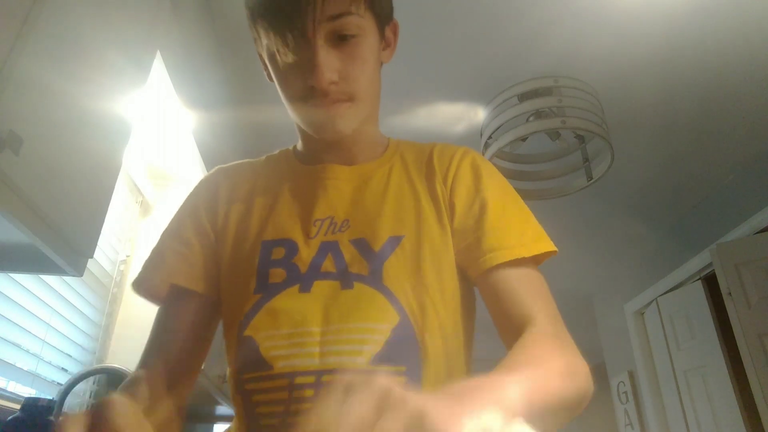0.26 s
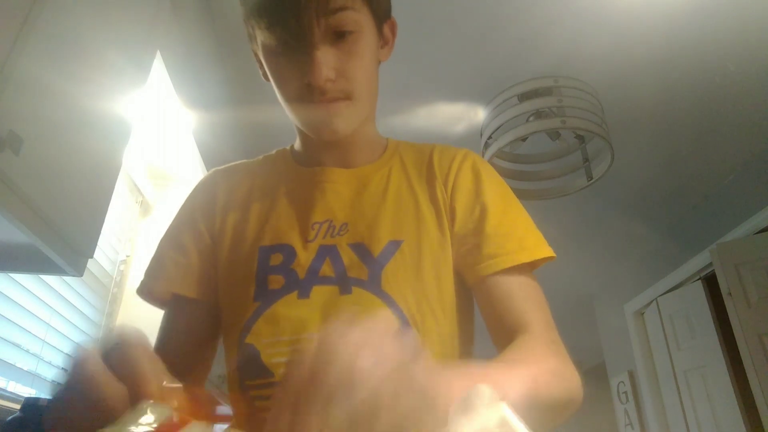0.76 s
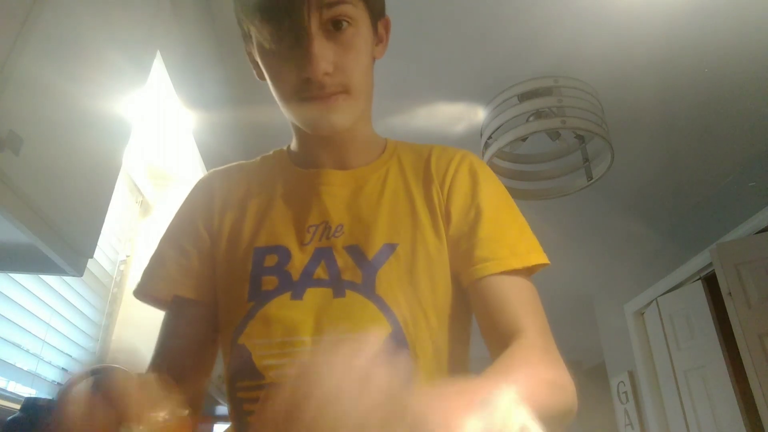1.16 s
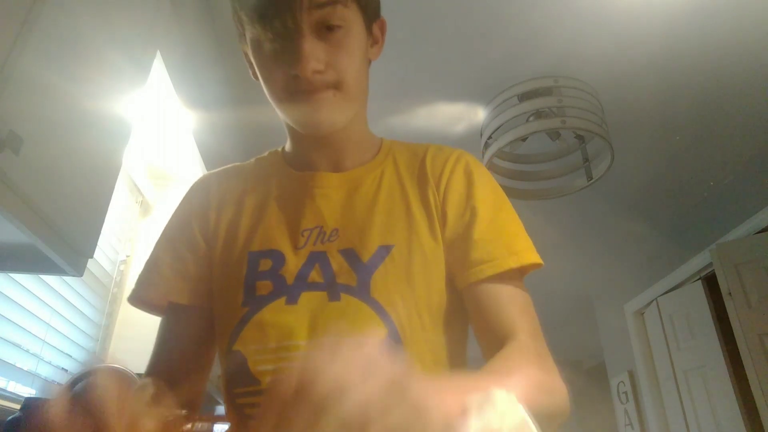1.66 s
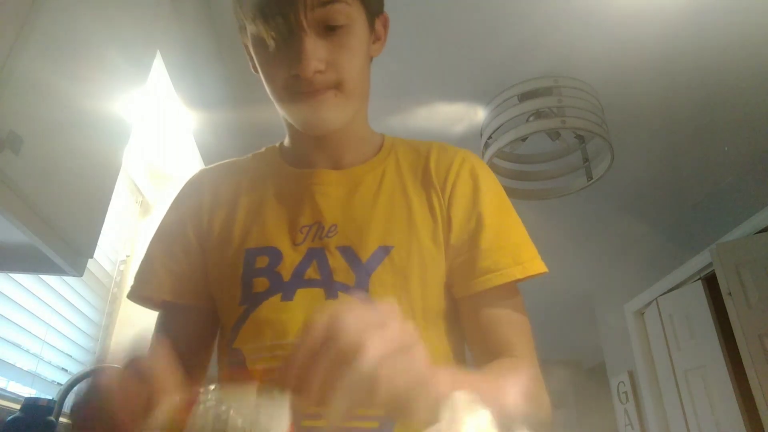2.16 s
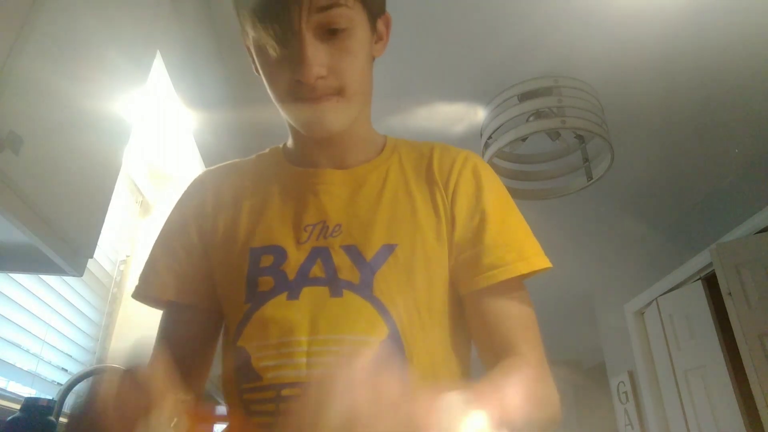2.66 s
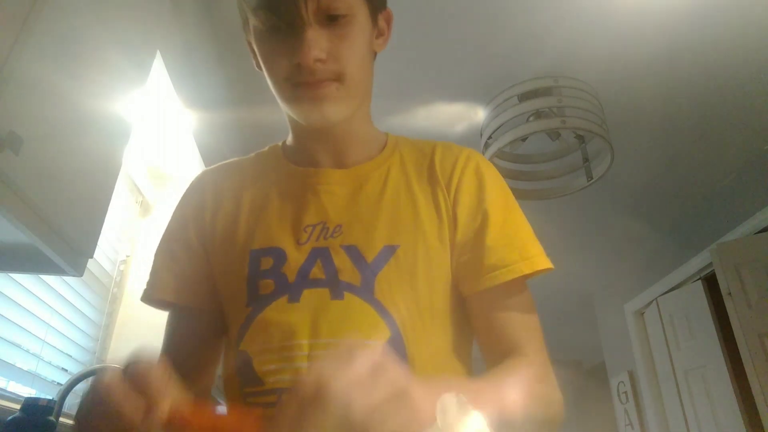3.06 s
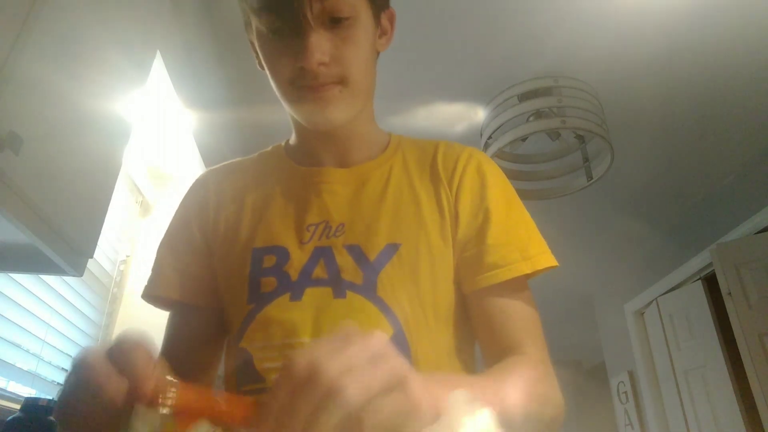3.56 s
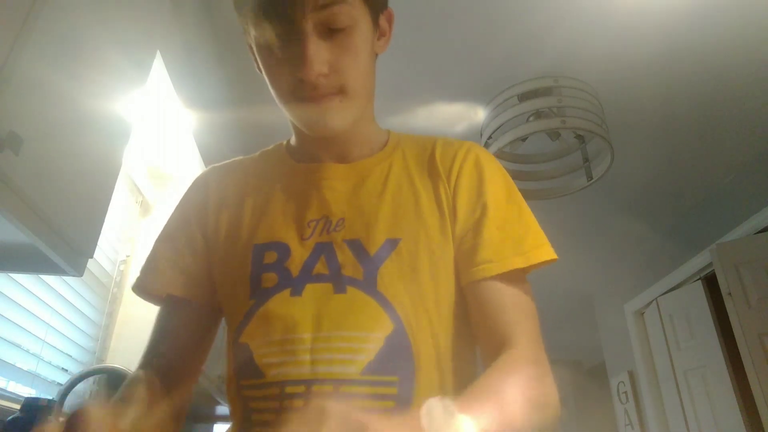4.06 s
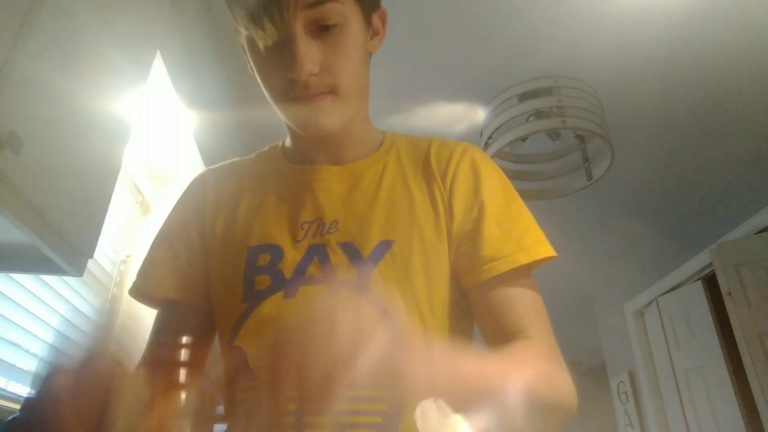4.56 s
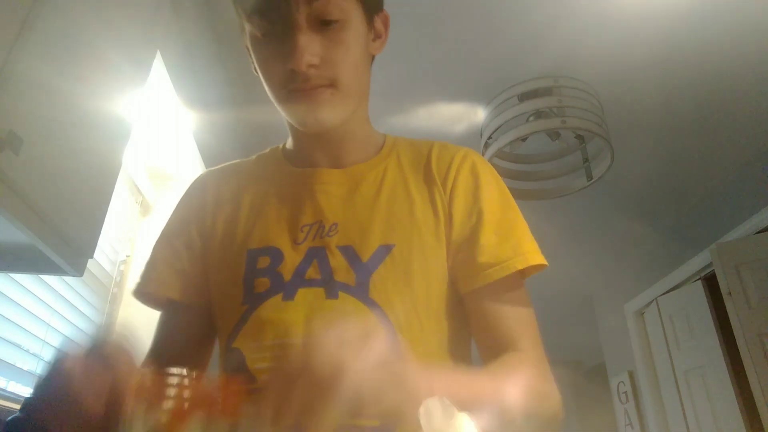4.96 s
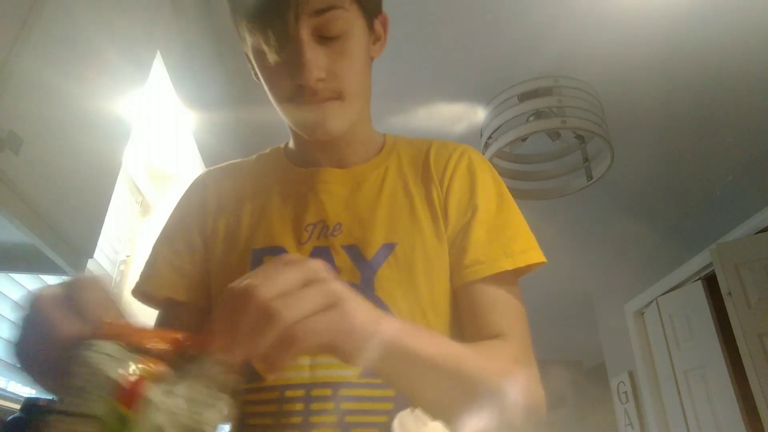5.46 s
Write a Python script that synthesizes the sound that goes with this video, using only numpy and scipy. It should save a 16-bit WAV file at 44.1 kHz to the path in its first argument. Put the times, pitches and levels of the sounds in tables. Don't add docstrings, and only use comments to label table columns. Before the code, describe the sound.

A foil bag of chips is shaken quickly by hand up close, crackling and snapping with dull hollow knocks in a small kitchen.

```python
import sys
import numpy as np
from scipy import signal
from scipy.fft import rfft, irfft, next_fast_len
from scipy.io import wavfile
from scipy.ndimage import uniform_filter1d

SR = 44100
rng = np.random.default_rng(int(sys.argv[2]) if len(sys.argv) > 2 else 0)


def linear_from_db(decibels):
    return 10 ** (np.asarray(decibels, float) / 20)


def int16_out(signal):
    q = np.round(np.clip(np.atleast_2d(signal).T, -1, 1) * 32767)
    wavfile.write(sys.argv[1], SR, q.astype(np.int16))


N = 252516

# peak_s, snap_level_db, fall_ms, knock_minus_snap_db
LANDINGS = [(0.082, -25, 13, -5), (0.101, -19, 14.4, 1.5), (0.49, -21, 30, -0.5), (.737, -24, 7.6, -5),
            (.962, -25, 11, -5), (1.037, -24.5, 19, -7), (1.087, -24, 5.5, 2), (1.461, -21.5, 19, 1.2),
            (1.57, -24.5, 15, -6.5), (1.626, -21.5, 13, -4.5), (1.643, -24.5, 26, 2), (1.763, -27, 36, -7),
            (2.302, -24.5, 20.5, 6), (2.535, -21, 15.7, 1), (2.777, -19, 16.5, 3.5),
            (3.033, -21.5, 13.5, 1), (3.265, -20.5, 44, -2), (3.288, -22, 6.5, 11),
            (3.351, -23.5, 24, -2.5), (3.508, -17.5, 20, 0.5), (3.538, -27, 20, -2), (3.75, -18.5, 10.5, 3),
            (3.936, -21, 19, 5.5), (3.979, -23, 34, -7), (4.017, -22, 19, 3.5), (4.278, -21.5, 17.7, 6),
            (4.657, -18.5, 15.6, 4.2), (4.923, -19.5, 16, 3.5), (5.16, -22, 13, 2.5),
            (5.325, -21, 25.4, 1.3)]
# peak_s, snap_level_db, fall_ms, knock_minus_snap_db
SLIDES = [(.02, -28.5, 3, -8.5), (0.306, -29, 25, 5), (.369, -26, 13, -3), (.578, -28, 17, 0.5),
          (.695, -28, 42, 3), (.828, -32, 25, -5.5), (0.886, -26, 13, -7), (1.067, -23.5, 9.1, 4.5),
          (1.168, -28.5, 17, 0.5), (1.24, -22.5, 7.5, -5), (1.278, -24.5, 22, 6.5),
          (1.368, -26.5, 10.6, -0.5), (1.449, -28.5, 11, 5.5), (1.551, -29, 12, 5.5),
          (1.686, -27.5, 5.1, -2), (1.737, -25, 10, -1.5), (1.866, -30.5, 15, -12), (2.005, -20, 20, 0),
          (2.059, -28, 8.6, -3), (2.879, -30.5, 21, -2), (3.124, -32, 19, -2.5), (3.598, -26, 26, 0.5),
          (3.818, -31.5, 15, 2.5), (4.112, -19.5, 18, 0), (4.191, -26, 14, -4.5), (4.415, -25, 13.4, 3.5),
          (4.998, -25, 11.6, 4.5), (5.22, -29.5, 10.5, 1.5), (5.31, -28, 7, 3.5), (5.716, -29, 62, 0)]
# peak_s, snap_level_db, fall_ms
TUMBLES = [(.062, -33.5, 8), (0.441, -36, 35), (.927, -28.5, 11.5), (1.42, -32.5, 15), (1.603, -31, 15),
           (1.831, -30.5, 20), (1.944, -35, 11), (2.086, -32.5, 34), (2.137, -36, 28), (2.365, -36.5, 31),
           (2.466, -30, 12), (2.516, -31.5, 16), (2.588, -35.5, 42), (2.629, -30.5, 10), (2.745, -32.5, 14),
           (2.825, -34, 24), (2.848, -35.5, 13), (2.956, -29.5, 29), (3.093, -31.5, 8.5), (3.47, -34, 21),
           (3.901, -32, 62), (4.349, -36.5, 21), (4.473, -36.5, 19), (4.631, -29.5, 11), (4.721, -32, 32),
           (4.882, -41, 9), (5.383, -33, 15), (5.589, -31, 23), (5.62, -34, 19), (5.686, -35.5, 22)]
# peak_s, snap_level_db, fall_ms
CRINKLES = [(0.224, -30.5, 7.5), (.336, -31, 8.1), (0.469, -31, 17), (0.627, -40.5, 7.5),
            (.719, -27.5, 7.5), (0.764, -28.5, 14), (0.848, -22, 8.1), (.989, -30, 9), (1.097, -31, 25),
            (1.182, -31.5, 35), (1.388, -22.5, 6.7), (1.92, -28, 5.8), (2.113, -30, 8.3), (2.18, -29.5, 11),
            (2.804, -22.5, 9.3), (2.992, -29, 6.9), (3.005, -27, 18), (3.24, -32, 8.4), (3.44, -35, 7.5),
            (4.513, -39, 7.5), (4.532, -41, 7.5), (4.707, -33, 7.5), (4.736, -34, 23), (4.818, -41, 7.5),
            (4.856, -41, 6.9), (5.114, -34, 6.9), (5.132, -41, 7.5), (5.237, -32, 7.5), (5.25, -30, 16),
            (5.406, -28, 12)]
# peak_s, snap_level_db, knock_minus_snap_db
SLIPS = [(0.178, -29.5, 5), (0.195, -28, 6), (0.212, -28.5, -5), (.253, -35, -6), (.786, -31.5, 1),
         (1.325, -38, 5), (1.346, -31, 0), (1.527, -34, 4), (1.804, -32.5, 10), (1.82, -31, -1),
         (1.891, -30, -1), (1.97, -28, 3), (2.039, -31, -2.2), (2.225, -40.5, 5), (2.279, -33, -13),
         (2.41, -39, 3), (2.434, -34.5, 6), (2.483, -36, 0), (2.653, -28, 0), (2.71, -29, 4),
         (2.898, -28, -8), (3.168, -33, 1.2), (3.19, -29, 1), (3.225, -32.5, 3), (3.69, -26, -4),
         (3.702, -29, 2.2), (4.776, -34.5, -6), (5.1, -32.5, 4), (5.512, -31.5, 1), (5.546, -33, 1)]
RISE_MS = {"landing": 5.9, "slide": 19.7, "tumble": 5.4, "crinkle": 3, "slip": 3}
# time_s, snap_level_db
STIRRING = [(0, -41.5), (.3, -37.5), (.55, -42), (1, -37), (1.5, -40), (1.8, -41.5), (2.2, -51.5),
            (2.55, -37), (3, -44.5), (3.45, -43), (3.75, -38.5), (4.3, -39), (4.55, -52.5), (4.85, -53),
            (5.25, -36.5), (5.75, -53)]
# start_s, peak_db
POPS = [(.0169, -21), (.439, -20), (.663, -13), (.846, -12.5), (1.147, -13), (1.1992, -16), (1.2356, -18),
        (1.2713, -12.5), (1.3463, -26), (1.3634, -16), (1.448, -12.5), (1.805, -12.5), (1.8195, -12.5),
        (1.9719, -11), (1.9936, -12.5), (2.1358, -16), (2.2248, -21), (2.369, -21), (2.762, -15),
        (2.8981, -12.5), (3.1854, -18.5), (3.2396, -15.5), (3.687, -24), (4.41, -13), (4.6164, -18),
        (5.1315, -18), (5.3023, -14), (5.4079, -12.5), (5.51, -14), (5.6208, -10)]
# pitch_hz, level_db
FILM_COLOUR = [(1200, -11), (1700, -10.5), (2050, -62), (2500, -8.5), (3700, -12), (4300, -5), (7500, -9.5),
               (9000, -15), (10300, -11), (11500, -16), (15600, -18)]
# pitch_hz, width_hz, level_db
BAG_RESONANCES = [(131, 29, -20), (220.6, 95, -5), (294, 32, -7.5), (484, 98.6, 0), (557, 123, -3.5),
                  (947.5, 122, 2.5), (1065, 111.4, 1.5), (1200, 182, -4), (1720, 570, -10.5)]
# pitch_hz, time_s
ROOM_DECAY = [(200, 0.31), (1000, 0.059), (4000, 0.14), (12000, 0.028)]
# pitch_hz, level_db
ROOM_LEVEL = [(100, -3), (300, -4), (600, -11), (1200, -15), (3000, -14), (8000, -15), (15000, -15)]
# pitch_hz, level_db
LEFT_MINUS_RIGHT = [(40, 2), (100, 4.5), (220, 8), (450, 5), (700, 1.5), (900, 4.5), (1100, -0.14),
                    (2200, 2.46), (4300, 0.16), (6500, 0.1), (8500, 1), (10500, 3), (15000, 3.5)]
# pitch_hz, phase_rad
RIGHT_PHASE = [(60, 1.13), (130, 1.82), (215, -0.6), (300, -3), (430, -0.72), (600, -0.3), (1080, -0.93),
               (1500, 0.26), (2200, -0.18), (3400, 0.01), (5400, 0.16), (6500, -0.18), (7600, -0.72),
               (13000, 0.15)]
# pitch_hz, level_db_per_hz
KITCHEN_AIR = [(25, -100), (45, -80), (70, -86), (150, -82), (400, -73.5), (1000, -86), (3000, -85),
               (8000, -106.5), (15000, -100)]
# pitch_hz, width_hz, level_db
FRIDGE_HUM = [(113.5, 12, -53.5), (200, 14, -56)]
# pitch_hz, level_db
MICROPHONE_BAND = [(20, -25), (45, -6), (60, 0), (15700, 0), (15950, -25), (16200, -34),
                   (16700, -38), (17000, -70)]


def evened(x):
    return x / np.sqrt(np.mean(x ** 2) + 1e-20)


def read(points, hz):
    f, value = np.transpose(points)
    return np.interp(np.log(hz + 1), np.log(f + 1), value)


def shape(x, response):
    size = next_fast_len(N + 4096)
    spectrum = rfft(x, size) * response(np.fft.rfftfreq(size, 1 / SR))
    return irfft(spectrum, size)[..., :N]


def ring(x, hz, width):
    return signal.lfilter(*signal.iirpeak(hz, hz / width, SR), x)


def motions():
    landings = [(s, db, RISE_MS["landing"], fall, knock) for s, db, fall, knock in LANDINGS]
    slides = [(s, db, RISE_MS["slide"], fall, knock) for s, db, fall, knock in SLIDES]
    tumbles = [(s, db, RISE_MS["tumble"], fall, 5.5) for s, db, fall in TUMBLES]
    crinkles = [(s, db, RISE_MS["crinkle"], fall, -14.5) for s, db, fall in CRINKLES]
    slips = [(s, db, RISE_MS["slip"], 8.1, knock) for s, db, knock in SLIPS]
    return landings + slides + tumbles + crinkles + slips


def effort(count, knock, colour_db):
    t = np.arange(0, N + 32, 32) / SR
    start, jolt_db, rise, fall, knock_db = np.transpose(motions())[:, :, None]
    late_ms = (t - start) * 1000
    swell = np.exp(-np.where(late_ms < 0, (late_ms / rise) ** 2, late_ms / np.maximum(fall, 1)))
    jolts = (linear_from_db(jolt_db + knock * knock_db) * swell) ** 2
    favour = linear_from_db(colour_db * rng.standard_normal((len(start), count))) ** 2
    power = (favour / favour.mean(1, keepdims=True)).T @ jolts
    stir_s, stir_db = np.transpose(STIRRING)
    stir_knock_db = 4
    stirring = linear_from_db(np.interp(t, stir_s, stir_db + knock * stir_knock_db))
    levels = np.sqrt(power + stirring ** 2)
    return np.array([np.interp(np.arange(N) / SR, t, level) for level in levels])


def clicks(per_s, spread_db):
    hit = rng.random(N) < per_s / SR
    size = linear_from_db(spread_db * np.minimum(rng.exponential(1, N), 3.3))
    sign = rng.choice([-1., 1.], N)
    return evened(size * sign * hit)


def film(count=16):
    levels = effort(count, 0, colour_db=6.0)
    together = clicks(per_s=260, spread_db=3.0)
    out, t = np.zeros(N), np.arange(200) / SR
    for level, hz in zip(levels, np.geomspace(1700, 15000, count)):
        snap = np.sin(2 * np.pi * hz * t) * np.exp(-t * 1500 * (hz / 2500) ** 1.07)
        snap *= np.sqrt(hz) / np.linalg.norm(snap)
        flips = clicks(per_s=700, spread_db=1.0)
        flips += 0.37 * together / evened(level) ** 0.26
        out += signal.oaconvolve(level * flips, snap)[:N]
    out = shape(out, lambda hz: linear_from_db(read(FILM_COLOUR, hz)))
    return out * np.sqrt(np.mean(levels ** 2)) / np.std(out)


def pops():
    lead_s, above_snaps_db, loudest_db = 0.0041, -0.5, -12.5
    openings = [(s - lead_s, db + above_snaps_db) for s, db, _, _ in LANDINGS]
    rows = POPS + openings
    length, fall_s = 600, 0.0019
    out, t = np.zeros(N + length), np.arange(length) / SR
    bursts = rng.standard_normal((len(rows), length))
    for (s, db), burst in zip(rows, bursts):
        out[round(s * SR):][:length] += linear_from_db(min(db, loudest_db)) * burst * np.exp(-t / fall_s)
    return shape(out[:N], lambda hz: linear_from_db(read(FILM_COLOUR, hz) + 5.5))


def chips():
    levels = effort(len(BAG_RESONANCES), 0.73, colour_db=2.0)
    knocks = clicks(per_s=3000, spread_db=3.0)
    out = np.zeros(N)
    for level, (hz, width, db) in zip(levels, BAG_RESONANCES):
        weight = evened(level) ** (30 / hz)
        ringing = ring(level * weight * knocks, hz, width)
        out += linear_from_db(db) * ring(ringing, hz, 4.3 * width)
    return out * np.sqrt(np.mean(levels ** 2)) / np.std(out)


def swayed(x):
    sway_s = 0.005 / 1000
    hz, t, z = signal.stft(x, SR, nperseg=512, noverlap=384)
    wander = sum(np.sin(2 * np.pi * (f * t + rng.random())) for f in np.geomspace(1.5, 30, 24))
    turn = np.exp(-2j * np.pi * hz[:, None] * sway_s * evened(wander))
    return signal.istft(z * turn, SR, nperseg=512, noverlap=384)[1][:N]


def kitchen(x):
    taps = np.zeros((2, 16000))
    at = np.arange(60, 15970, 20) + rng.integers(0, 20, (2, 796))
    np.put_along_axis(taps, at, rng.choice([-1., 1.], at.shape), 1)
    hz, t, z = signal.stft(taps, SR, nperseg=256)
    decay = linear_from_db(-60 * t / read(ROOM_DECAY, hz)[:, None])
    decay *= linear_from_db(read(ROOM_LEVEL, hz))[:, None] / np.linalg.norm(decay, axis=1, keepdims=True)
    tail = signal.istft(z * decay, SR, nperseg=256)[1]
    tail *= np.sqrt(20 / 128)
    return signal.fftconvolve(x[None], tail, axes=1)[:, :N]


def fridge():
    shared, own = rng.standard_normal(N), rng.standard_normal((2, N))
    air = shape(shared + 0.15 * own, lambda hz: linear_from_db(read(KITCHEN_AIR, hz)) * np.sqrt(SR / 2))
    hum = sum(linear_from_db(db) * evened(ring(shared, hz, width)) for hz, width, db in FRIDGE_HUM)
    rumble = evened(ring(ring(rng.standard_normal(N) + 0.34 * own, 89, 110), 85, 140))
    smear_s, rest_db, shaking_share_db = 0.040, -71, -28
    shaking = uniform_filter1d(effort(1, 1, 0)[0], round(smear_s * SR))
    rumble *= linear_from_db(rest_db) + linear_from_db(shaking_share_db) * shaking
    return air + rumble + hum


def scene():
    bag = film() + pops() + chips()
    return np.array([bag, swayed(bag)]) + kitchen(bag) + fridge()


def roll_off(x):
    return signal.sosfilt(signal.butter(12, 17030, fs=SR, output="sos"), x)


def record(dry):
    lag_s = 0.428 / 1000

    def right_port(hz):
        phase = read(RIGHT_PHASE, hz) - 2 * np.pi * hz * lag_s
        return -linear_from_db(-read(LEFT_MINUS_RIGHT, hz)) * np.exp(1j * phase)

    pair = np.array([dry[0], shape(dry[1], right_port)])
    mix = shape(pair, lambda hz: linear_from_db(read(MICROPHONE_BAND, hz)))
    return roll_off(mix)


dry = scene()
out = record(dry)
int16_out(out)
```